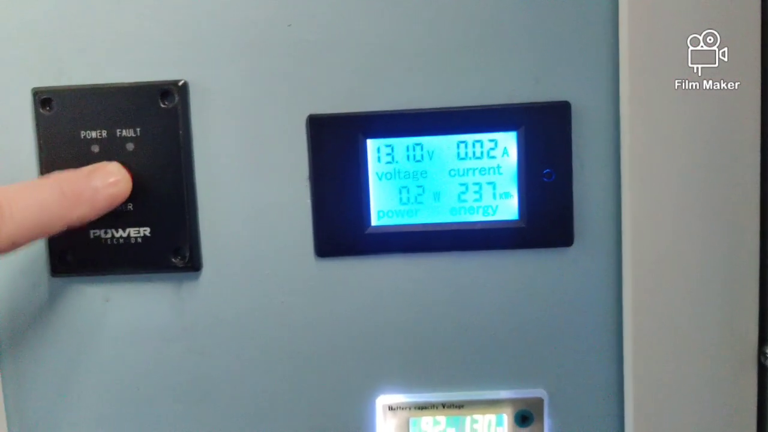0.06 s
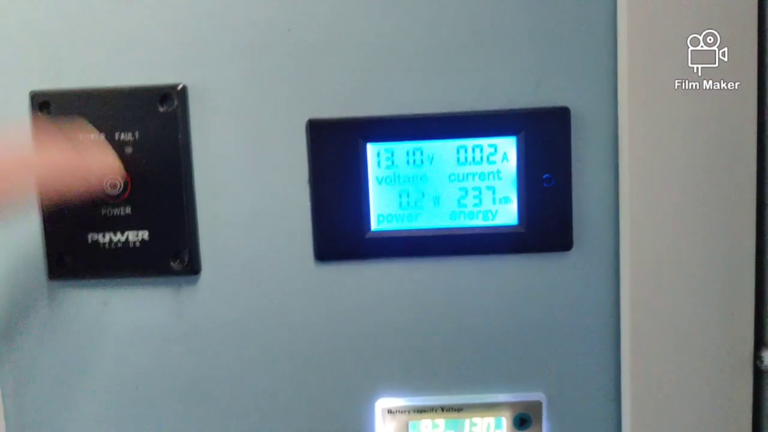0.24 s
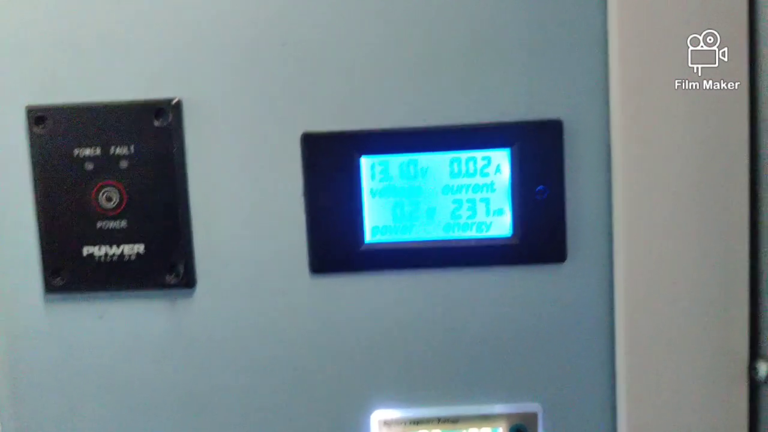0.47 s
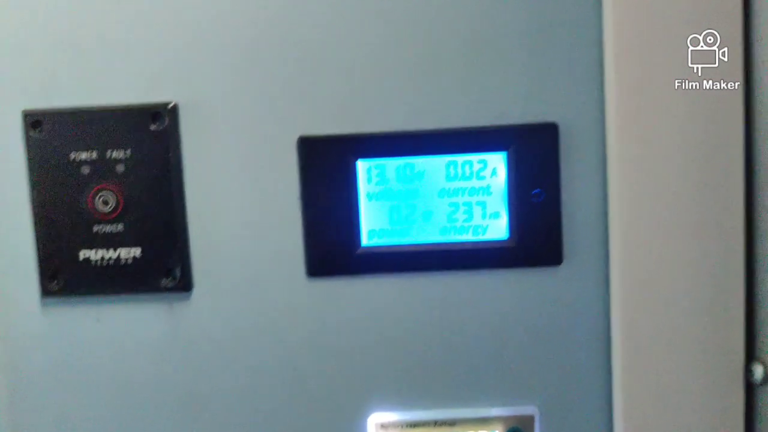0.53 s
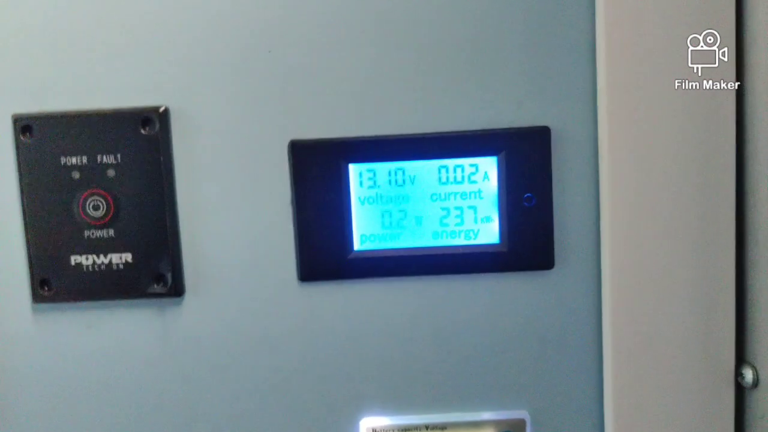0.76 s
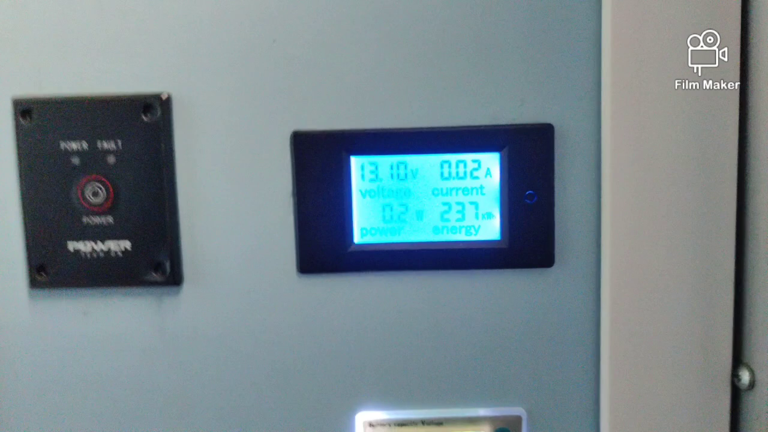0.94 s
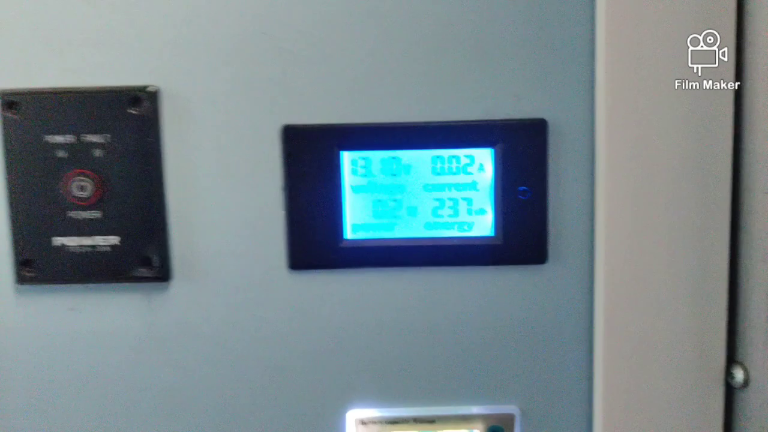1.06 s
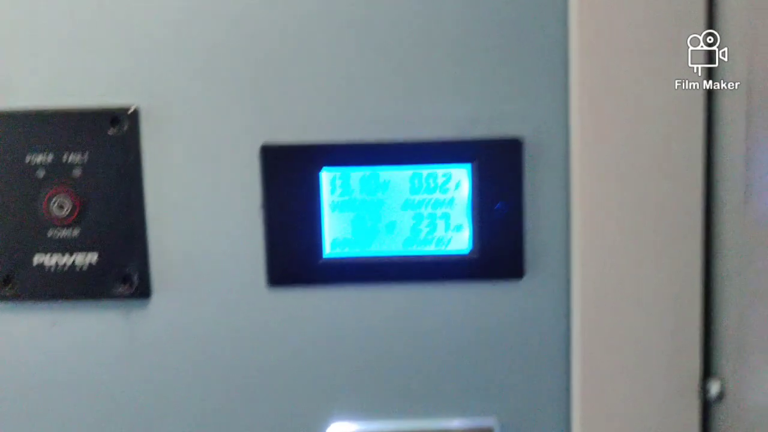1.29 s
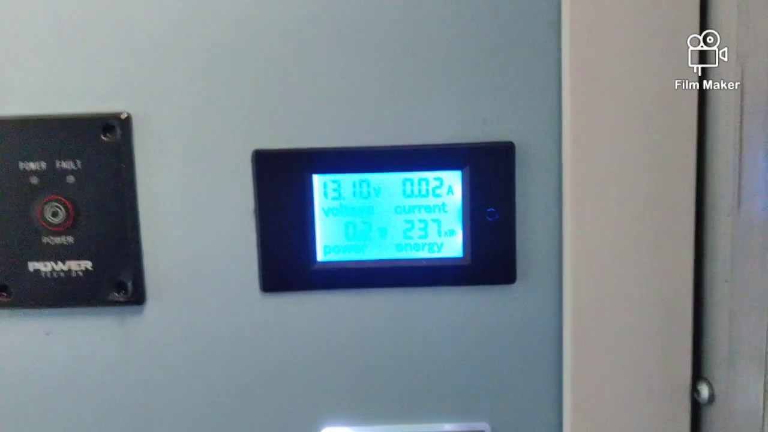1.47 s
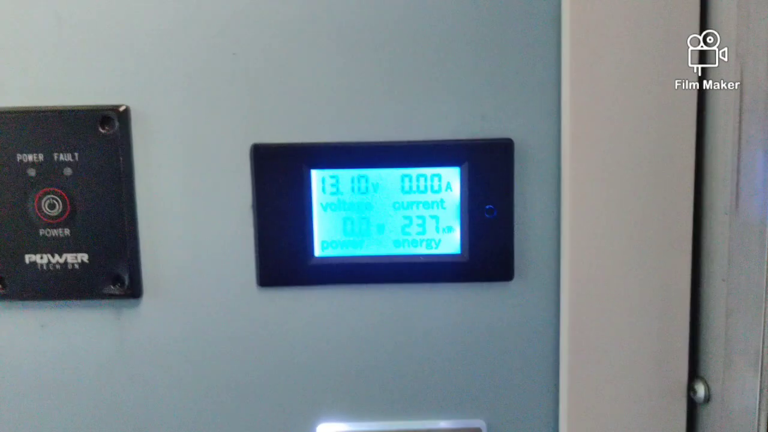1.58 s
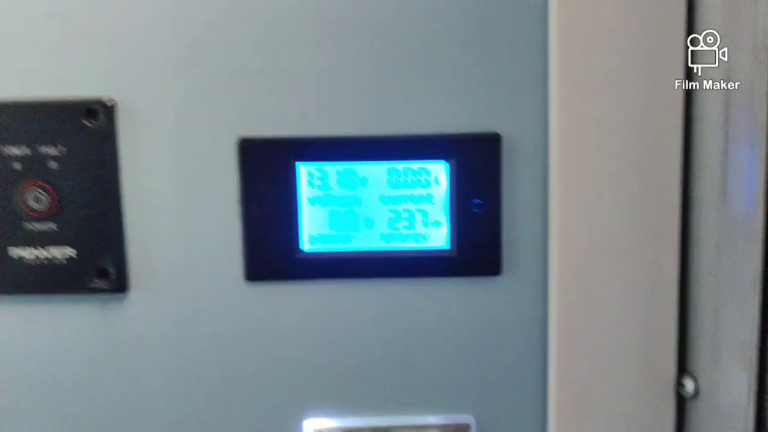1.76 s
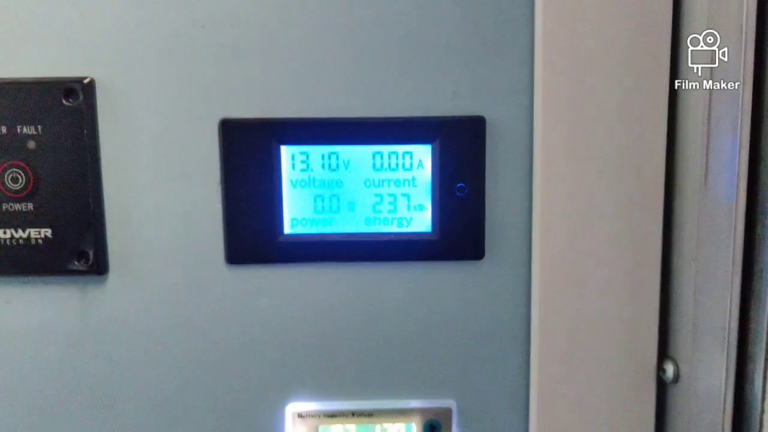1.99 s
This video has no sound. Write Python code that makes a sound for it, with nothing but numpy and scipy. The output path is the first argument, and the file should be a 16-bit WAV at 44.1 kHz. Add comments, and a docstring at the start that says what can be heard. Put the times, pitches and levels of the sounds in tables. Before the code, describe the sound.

One sharp plastic button snap on a thin panel in a small trailer, after a tiny hand scrape. Quiet low hum and rumble continue; fingers finally tick, bump and squeak on the handheld camera's case.

```python
"""A brief scrape of the hand on the camera opens, then a push button snaps once on a wall panel in a small trailer.
The snap is a filtered impulse with plastic chatter, ringing panel modes and a short noise echo of the cabin.
Under it a faint motor hum of gliding sines slows and settles, over shaped-noise rumble and hiss.
Faint rubs pass midway; near the end the hand shifts on the camera: ticks, rubs, bumps and squeaks, made
of resonant impulses, grainy noise, pressure pulses and short whistles, play at its two microphone ports."""
import sys
import numpy as np
from scipy import signal
from scipy.fft import rfft, irfft
from scipy.io import wavfile

SR = 44100
rng = np.random.default_rng(int(sys.argv[2]) if len(sys.argv) > 2 else 0)


def transcribe(signal):
    """Save signal, clipped to [-1, 1], as a 16-bit WAV file at the path in sys.argv[1]."""
    frames = np.atleast_2d(signal).T
    limited = np.clip(frames, -1, 1)
    pcm = np.round(limited * 32767).astype(np.int16)
    wavfile.write(sys.argv[1], SR, pcm)


N = 89611
T = np.arange(N) / SR
HZ = np.fft.rfftfreq(N, 1 / SR)

# Button, a thin touch and then the snap: (time [s], level [dB], low cut [Hz])
BUTTON_PRESSES = [(0.103, -21, 4000), (0.125, -1, 30)]
# Colour of the snap at each port: (frequency [Hz], gain [dB])
SNAP_COLOUR_LEFT = [(40, -8), (200, -3), (950, 2.5), (1500, -12.5), (1780, -10), (2020, -6), (2400, -7),
                    (3300, -8), (6800, -13.5), (9000, -21), (10200, -37), (16000, -43)]
SNAP_COLOUR_RIGHT = [(40, -2), (200, 4.5), (600, -2.5), (1350, -16), (1780, -3.5), (2020, -6), (2400, 2),
                     (3300, -9), (4600, 0.5), (6800, -22.5), (7800, -45), (16000, -42)]
SNAP_DB, RIGHT_PORT_LAG_S = -4.5, .00012
# The button's plastic chatter, with its decay constant
CHATTER_DB, CHATTER_DECAY_S, CHATTER_LOW_CUT_HZ = 0.5, 0.0035, 1520
# Ringing modes of the wall panel: (frequency [Hz], level [dB], t60 [s])
PANEL_MODES = [(92.3, 0, 0.37), (246, 4, 0.075), (308, -6, 0.08), (402, 5, 0.055), (594, -1, 0.063),
               (915, -7, 0.05), (1022, -6, 0.07), (1750, -5, 0.02), (2540, 6, 0.013), (4490, -4, 0.07)]
PANEL_DB, PANEL_PAN_DB = -45.5, -0.5
# Decay of the trailer's echo: (frequency [Hz], t60 [s])
ECHO_T60 = [(100, .15), (1000, .1), (4500, .1), (12000, .08)]
# Colour of that echo: (frequency [Hz], gain [dB])
ECHO_COLOUR = [(100, -4.5), (1000, -11), (4500, -7), (12000, 6.5)]

# Response of each port to touches on the camera: (frequency [Hz], gain [dB])
PORT_RESPONSE_LEFT = [(100, -10), (1000, -23), (3700, -21), (4120, -14), (4400, -17.5), (4740, -15.5),
                      (5400, -13.5), (6600, -8), (7800, -1.5), (8900, -10.5), (10200, -14), (15500, -39.5)]
PORT_RESPONSE_RIGHT = [(100, -7.5), (1000, -20.5), (3750, -20.5), (4100, -10), (4400, -11), (4720, -4.5),
                       (5150, -9), (5700, -26), (6600, -19), (7800, -28.5), (15500, -41)]
# Ticks of the camera's case:
# (time [s], left level [dB], right level [dB], decay constant [s], pitch [Hz])
CASE_TICKS = [(.001, -5.5, -7, 0.0097, 10000), (1.7865, -6, -1.5, .0002, 3730),
              (1.7894, -13, -5, 0.00071, 3770), (1.801, -5, -6, .0006, 5400), (1.811, -9, -12, .0015, 7200),
              (1.8168, -8, -9, .0008, 5200), (1.8281, 4.5, -12, .0013, 7800),
              (1.8289, -3, 2.5, .0016, 4900), (1.9365, -24, -15, .0003, 4100),
              (1.9425, -17, -15, .0007, 2900), (1.9455, -11, -35, .00012, 7200),
              (1.9712, -2.5, 1, 0.004, 4750)]
# Sharpness of a tick's pitch, level of its slips, and its unpitched share
TICK_DB, TICK_Q, TICK_SLIPS_DB, TICK_CRACK_DB = -16.5, 4, 3, -16
# Skin rubbing the case:
# (peak time [s], rise [s], fall [s], left level [dB], right level [dB], fizz level [dB])
SKIN_RUBS = [(.001, .002, .018, -45, -42, -1), (.399, .13, .2, -67.5, -79.5, -2),
             (.638, .074, .11, -72, -74.5, -4), (1.482, .038, .047, -69.5, -71.5, -6),
             (1.725, .06, .037, -68.5, -73, -3), (1.787, .0066, .035, -55, -53, -12),
             (1.833, .0013, .028, -52.5, -53, -10), (1.855, .006, .004, -52, -52, -8),
             (1.937, .01, .089, -57, -71, -3), (1.984, .005, .03, -52, -50.5, -12)]
# Depth of the grain, and cutoff of the random wander behind grain and squeak jitter
RUB_GRAIN_DB, GRAIN_CUTOFF_HZ = 3, 600
DRAG_DB, DRAG_CUTOFF_HZ = -11, 294
FIZZ_RIGHT_DB = -8  # the fizz is weaker at the right port
# Soft bumps of the hand:
# (time [s], width [s], left level [dB], right level [dB], signed push factor [ratio])
HAND_BUMPS = [(1.7959, .0012, -23, -49, 0.87), (1.8021, 0.0024, -33, -56, -0.74),
              (1.81, 0.0007, -24.5, -42, -0.29), (1.817, 0.0027, -31, -51, -1.6),
              (1.825, 0.0036, -34, -62, 1), (1.945, 0.0049, -32.5, -50, 1),
              (1.9732, 0.00096, -39, -51, 0.92)]
BUMP_LOW_CUT_HZ = 35
# Hollow knock of the case under the bumps: (frequency [Hz], level [dB], t60 [s])
KNOCK_MODES = [(265, 1, 0.021), (452.9, -17, .018), (837, 8.5, 0.024)]
# Squeaks of skin at the left port: (time [s], width [s], pitch [Hz], level [dB])
SKIN_SQUEAKS = [(1.8539, 0.0067, 7750, -42.5), (1.992, 0.0036, 8100, -38.5)]
SQUEAK_JITTER_HZ = 160

# Glide of the motor: (time [s], pitch [Hz], level [dB])
MOTOR_GLIDE = [(0, 148.6, -64.5), (0.12, 140.5, -60.5), (0.246, 117.8, -58), (0.387, 107.4, -55),
               (0.509, 106.3, -52.5), (0.998, 111.1, -57.5), (1.4, 110.5, -54.5), (1.752, 112.6, -54.5),
               (1.86, 111.6, -49.5)]
# Tones locked to that glide: (multiple of the pitch [ratio], level [dB])
MOTOR_PARTIALS = [(.627, -6), (1, 1), (2, -28.5)]
# A weaker tone above it with its own glide: (time [s], pitch [Hz], level [dB])
UPPER_GLIDE = [(0, 178.4, -73), (0.349, 182, -66), (0.801, 193.1, -68.5), (1.699, 192.2, -73)]
WAVER_DB, HUM_BALANCE_DB = 1.5, -1.7

# Spectrum of the still air: (frequency [Hz], relative level [dB per Hz])
RUMBLE_SPECTRUM = [(15, -0.5), (45, -3.5), (90, 2), (150, -11), (230, -15), (330, -22), (500, -30),
                   (1000, -32), (3000, -39), (16000, -56)]
RUMBLE_DB = -60.5
# Likeness of the rumble at the two ports: (frequency [Hz], correlation [-1 to 1])
RUMBLE_LIKENESS = [(200, .88), (450, .35), (1000, -.1)]
# Each port's own hiss: (left level [dB], right level [dB])
PORT_HISS = [-77.5, -79]
# Steady ring of the air in the ports: (left level [dB], right level [dB])
PORT_AIR = [-82.5, -76.5]
BAND_EDGE_HZ = 15950


def button(size=12288):
    """A sharp snap with a brief chatter; the panel rings in sine modes and the cabin answers."""
    t = T[:size]
    slips = rng.choice([-1., 1.], (2, size)) * np.exp(-t / CHATTER_DECAY_S)
    chatter = unit_energy(low_cut(slips, CHATTER_LOW_CUT_HZ))
    drive = amp(CHATTER_DB) * chatter + room()
    # The contact itself is one negative impulse, a little later at the right port
    drive[0, 0] -= 1
    drive[1, round(RIGHT_PORT_LAG_S * SR)] -= 1
    snap_filters = np.array([colour(SNAP_COLOUR_LEFT), colour(SNAP_COLOUR_RIGHT)])
    snap = amp(SNAP_DB) * convolve(drive, snap_filters)[:, :size]
    ring = np.zeros(size)
    for hz, db, t60 in PANEL_MODES:
        ring -= amp(db - 60 * t / t60) * np.sin(2 * np.pi * hz * t)
    panel_gain = amp([[PANEL_DB + PANEL_PAN_DB], [PANEL_DB - PANEL_PAN_DB]])
    click = snap + panel_gain * ring
    out = np.zeros((2, N))
    for s, db, low_hz in BUTTON_PRESSES:
        add(out, s, amp(db) * low_cut(click, low_hz))
    return out


def room(size=12288):
    """Short noise echo of the small cabin, each band dying at its own speed."""
    hz, t, bands = signal.stft(rng.choice([-1., 1.], (2, size)), SR, nperseg=128)
    bands = bands * amp(-60 * t / read(ECHO_T60, hz)[:, None])
    tail = signal.istft(bands, SR, nperseg=128)[1][:, :size]
    tail *= 1 - np.exp(-T[:size] / 0.0075)  # the echo builds up over several milliseconds
    return convolve(unit_energy(tail), colour(ECHO_COLOUR)[None])[:, :size]


def ticks(size=2048):
    """Each tick is a crisp contact and a tight cluster of slips, pitched, ringing the ports."""
    out = np.zeros((2, N))
    for s, left_db, right_db, decay, hz in CASE_TICKS:
        slips = rng.choice([-1., 1.], (2, size)) * np.exp(-T[:size] / decay)
        drive = signal.unit_impulse(size) + amp(TICK_SLIPS_DB) * slips / 2
        pitched = band(drive, hz, TICK_Q)
        tick = ports(pitched + amp(TICK_CRACK_DB) * drive)[:, :size]
        add(out, s, amp(TICK_DB) * amp([[left_db], [right_db]]) * unit_energy(tick))
    return out


def rubs():
    """Grainy friction swells and dies as the fingers slide, with a fizz above and a dull drag below."""
    power, fizz_power = 0, 0
    for s, rise, fall, left_db, right_db, fizz_db in SKIN_RUBS:
        fade = np.where(T < s, ((s - T) / rise) ** 2, (T - s) / fall)
        stroke = amp([[left_db], [right_db]]) ** 2 * np.exp(-2 * fade)
        power = power + stroke
        fizz_power = fizz_power + amp(fizz_db) ** 2 * stroke
    grain = amp(RUB_GRAIN_DB * drift(GRAIN_CUTOFF_HZ))
    friction = unit(rng.standard_normal((2, N)) * grain)
    # Differencing white noise tilts it towards the treble
    fizz = unit(np.diff(rng.standard_normal((2, N + 1)))) * amp([[0], [FIZZ_RIGHT_DB]])
    low_pass = signal.butter(2, DRAG_CUTOFF_HZ, fs=SR)
    drag = unit(signal.lfilter(*low_pass, rng.standard_normal((2, N))))
    body = np.sqrt(power) * amp(DRAG_DB) * drag
    return ports(np.sqrt(power) * friction) + np.sqrt(fizz_power) * fizz + body


def bumps():
    """Pointed pressure puffs, mostly at the left port; the sharpest excite the case's hollow modes."""
    push = np.zeros((2, N))
    for s, width, left_db, right_db, factor in HAND_BUMPS:
        push += factor * amp([[left_db], [right_db]]) / (1 + ((T - s) / width) ** 2) ** 2
    knock = np.zeros((2, N))
    for hz, db, t60 in KNOCK_MODES:
        q = hz * t60 * np.pi / np.log(1000)
        knock += amp(db) * band(push, hz, q)
    return low_cut(push + knock, BUMP_LOW_CUT_HZ)


def squeaks():
    """Skin catches at the left port: a jittering sine whistles for a few milliseconds."""
    out = np.zeros((2, N))
    for s, width, hz, db in SKIN_SQUEAKS:
        turns = np.cumsum(hz + SQUEAK_JITTER_HZ * drift(GRAIN_CUTOFF_HZ)) / SR
        out[0] += amp(db) * np.exp(-((T - s) / width) ** 2) * np.sin(2 * np.pi * turns)
    return out


def hum():
    """Low motor sines sag in pitch together; a weaker tone glides above, and all waver in level."""
    s, hz, db = np.transpose(MOTOR_GLIDE)
    turns = np.cumsum(np.interp(T, s, hz)) / SR
    level = np.interp(T, s, db)
    motor = np.zeros(N)
    for multiple, tone_db in MOTOR_PARTIALS:
        gain = amp(level + tone_db + WAVER_DB * drift(24))
        motor += gain * np.sin(2 * np.pi * (multiple * turns + rng.random()))
    s, hz, db = np.transpose(UPPER_GLIDE)
    upper_turns = np.cumsum(np.interp(T, s, hz)) / SR
    upper_gain = amp(np.interp(T, s, db) + WAVER_DB * drift(33))
    upper = upper_gain * np.sin(2 * np.pi * upper_turns)
    balance = amp([[HUM_BALANCE_DB / 2], [-HUM_BALANCE_DB / 2]])
    return np.sqrt(2) * balance * (motor + upper)  # root two makes the levels RMS


def air():
    """Noise rumble, alike at both ports in the bass, plus each port's own hiss and ring."""
    left, other = rfft(rng.standard_normal((2, N))) * amp(read(RUMBLE_SPECTRUM, HZ))
    same = np.clip(read(RUMBLE_LIKENESS, HZ), -1, 1)
    right = same * left + np.sqrt(1 - same ** 2) * other
    rumble = amp(RUMBLE_DB) * unit(irfft(np.array([left, right]), N))
    hiss = amp(PORT_HISS)[:, None] * rng.standard_normal((2, N))
    port_ring = ports(amp(PORT_AIR)[:, None] * rng.standard_normal((2, N)))
    return rumble + hiss + port_ring


def ports(x):
    """Sound in the camera's case rings each microphone port with its own resonances."""
    h = np.array([colour(PORT_RESPONSE_LEFT), colour(PORT_RESPONSE_RIGHT)])
    return convolve(x, unit_energy(h))


def drift(cutoff_hz):
    """Random wander of RMS 1, low-passed around the cutoff."""
    spectrum = rfft(rng.standard_normal(N))
    return unit(irfft(spectrum / (1 + (HZ / cutoff_hz) ** 4), N))


def colour(points, size=4096):
    """Causal, minimum-phase impulse response with the given spectrum."""
    hz = abs(np.fft.fftfreq(size, 1 / SR))
    log_gain = np.log(amp(read(points, hz)))
    spectrum = np.exp(np.conj(signal.hilbert(log_gain)))
    return np.fft.ifft(spectrum).real[:size // 2]


def band(x, hz, q):
    """One resonance of peak gain 1."""
    return signal.lfilter(*signal.iirpeak(min(hz, SR / 2 - 1), max(q, 1), fs=SR), x)


def low_cut(x, hz):
    """Gently thins out the bass with a first-order high-pass."""
    return signal.lfilter(*signal.butter(1, hz, "high", fs=SR), x)


def amp(db):
    """Decibels to amplitude ratio."""
    return 10 ** (np.asarray(db) / 20)


def unit(x):
    """Scales each channel to RMS 1."""
    return x / np.sqrt(np.mean(x ** 2, axis=-1, keepdims=True) + 1e-20)


def unit_energy(x):
    """Scales each channel to a total energy of 1."""
    return x / np.linalg.norm(x, axis=1, keepdims=True)


def read(points, hz):
    """Reads a curve between its points along a logarithmic frequency axis."""
    f, value = np.transpose(points)
    return np.interp(np.log(hz + 1), np.log(np.sort(f) + 1), value)


def add(mix, s, sound):
    """Lays a sound into the mix at time s, cut off at the end."""
    part = mix[..., max(round(s * SR), 0):][..., :sound.shape[-1]]
    part += sound[..., :part.shape[-1]]


def convolve(x, h):
    """Filters x by an impulse response, kept to the scene's length."""
    return signal.fftconvolve(x, h, axes=-1)[..., :N]


def scene():
    """A brief hand scrape, then the button, then the hand again on the camera, over hum and still air."""
    hand = ticks() + rubs() + bumps() + squeaks()
    return button() + hand + hum() + air()


def record(dry):
    """The recorder's band limit: a steep linear-phase low-pass."""
    low_pass = signal.firwin(511, BAND_EDGE_HZ, window=("kaiser", 9), fs=SR)
    return signal.oaconvolve(dry, low_pass[None], "same")


dry = scene()
out = record(dry)
transcribe(out)
```